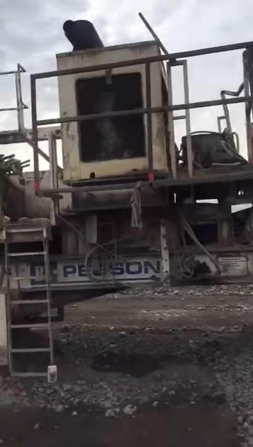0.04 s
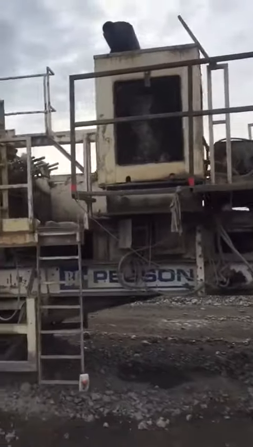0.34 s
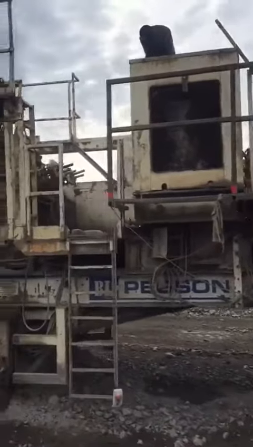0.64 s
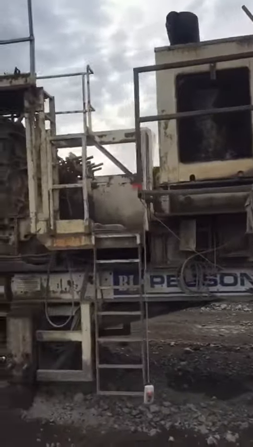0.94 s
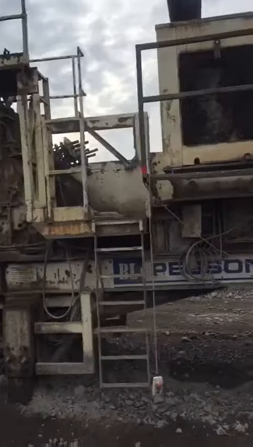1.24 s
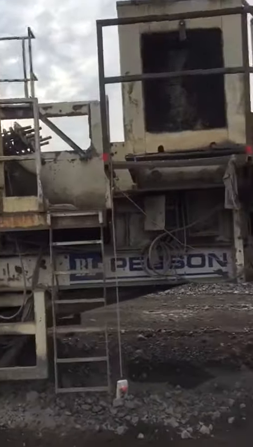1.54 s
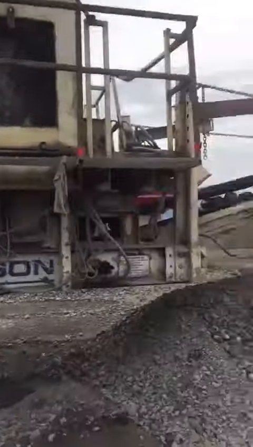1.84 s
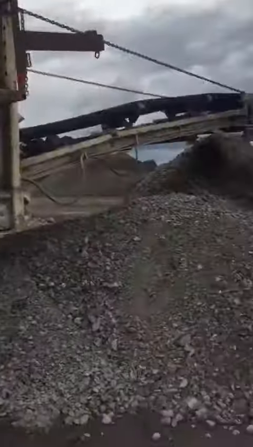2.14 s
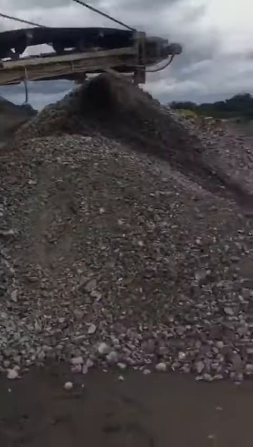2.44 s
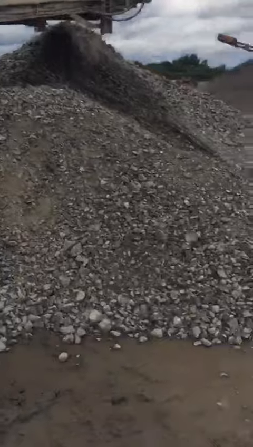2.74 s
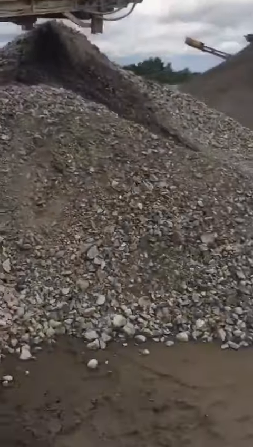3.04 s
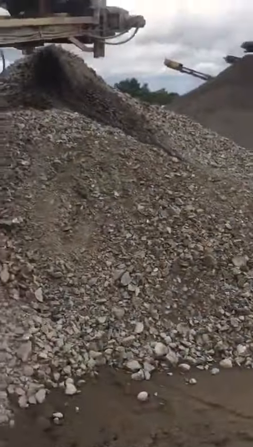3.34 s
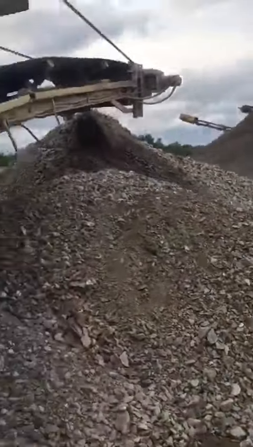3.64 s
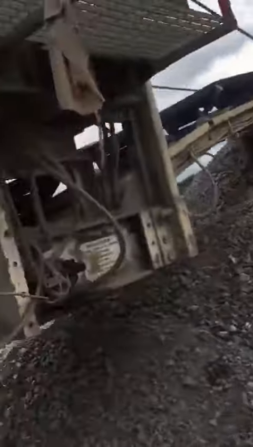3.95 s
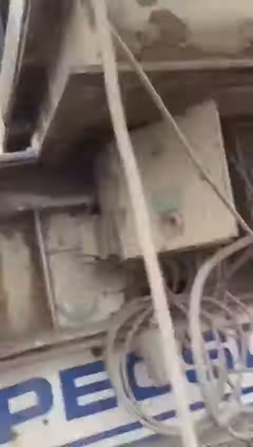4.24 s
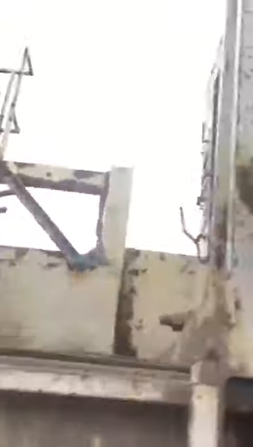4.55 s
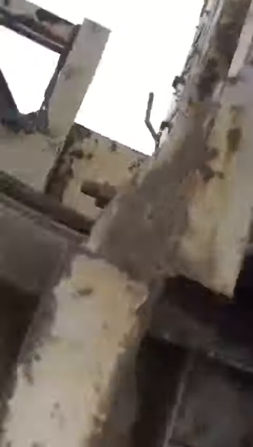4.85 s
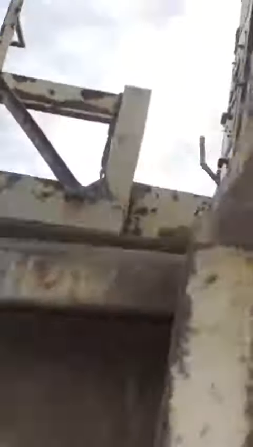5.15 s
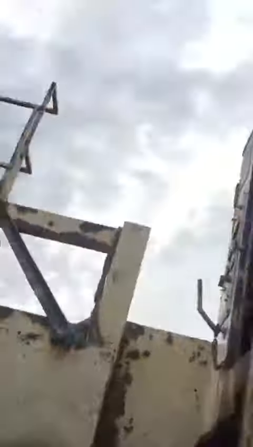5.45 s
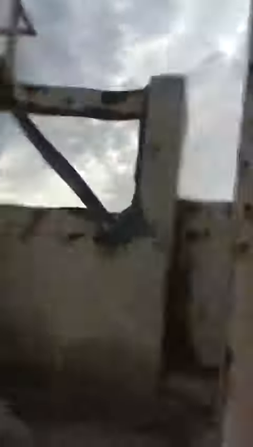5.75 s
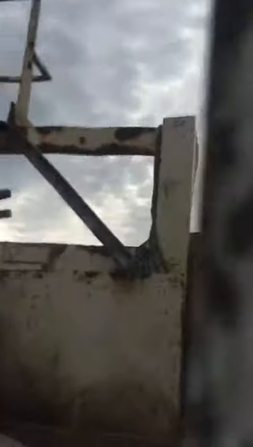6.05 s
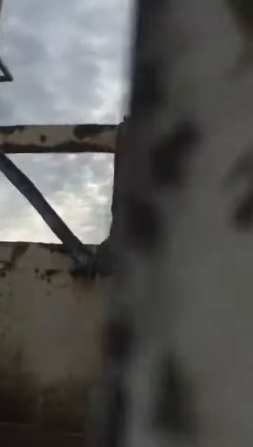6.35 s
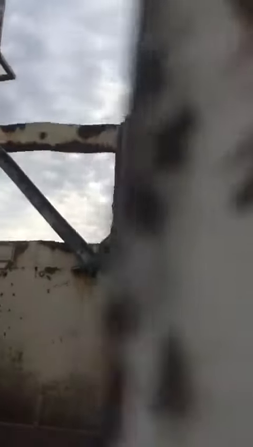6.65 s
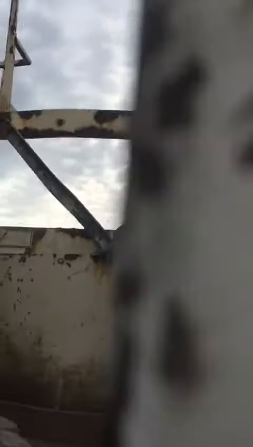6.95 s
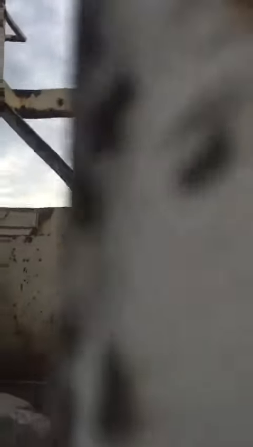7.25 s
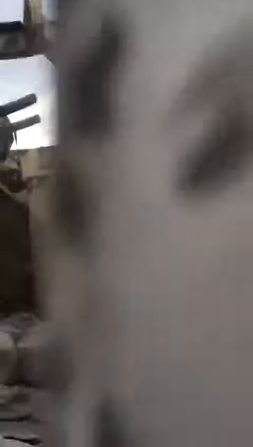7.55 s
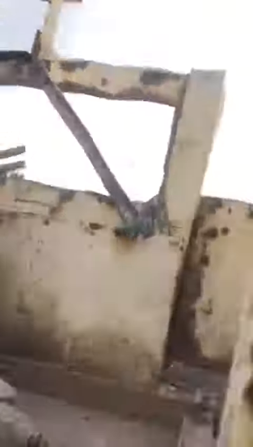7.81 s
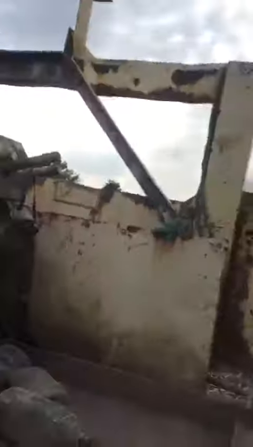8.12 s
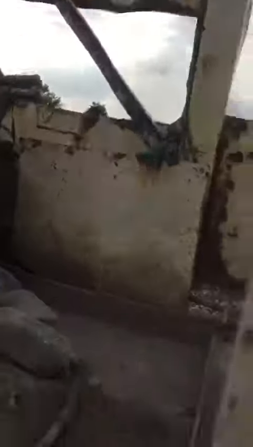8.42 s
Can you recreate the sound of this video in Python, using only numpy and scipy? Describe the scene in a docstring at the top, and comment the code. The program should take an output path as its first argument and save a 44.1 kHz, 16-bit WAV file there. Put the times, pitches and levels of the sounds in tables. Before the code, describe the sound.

A large rock crusher runs outdoors, its diesel engine droning and clattering at a constant speed over a low rumble. Steel panels ring and whine, crushed stone hisses off a conveyor belt, and single stones skitter down. Wind bumps the microphone in the first three seconds. As the microphone moves along the machine, the drone grows deeper and stronger, and a light, fast rattle joins briefly near the end.

```python
"""A mobile rock crusher's six-cylinder diesel drones and clatters outdoors at governed speed.
A second shaft beats against the exhaust, steel panels sing on the engine orders, the frame rumbles.
Crushed stone hisses off the belt, single stones skitter down, and early gusts bump the microphone.
The mix shifts as the listener walks past the stockpile and up behind a steel beam,
where something loose rattles once every engine cycle."""
import sys
import numpy as np
from scipy import signal
from scipy.fft import rfft, irfft, next_fast_len
from scipy.io import wavfile
from scipy.ndimage import uniform_filter1d, map_coordinates

SR = 44100
rng = np.random.default_rng(int(sys.argv[2]) if len(sys.argv) > 2 else 0)


def wav_out(sig):
    """Save sig, one row per channel (or a flat mono array), as 16-bit PCM at SR to the path in sys.argv[1]."""
    wavfile.write(sys.argv[1], SR, np.round(np.clip(np.atleast_2d(sig).T, -1, 1) * 32767).astype(np.int16))


N = 373968
CYCLE_HZ, SHAFT_HZ = 14.61, 40.53  # all six cylinders fire once in a cycle
TOP_HZ = 11900  # high cut of the mix

# the walk through six spots (front, turn, pile, chassis, beam, deck): arrival t/s, crossfade/s
WALK = [(-1, .2), (.85, .4), (2.72, .45), (3.85, .5), (5.62, .22), (7.87, .14)]
# a fader for each source, one value per spot: level/dB
EXHAUST_FADER = [-3, -4, -8, -1, 3, 1]
SHAFT_FADER = [-4, -8, -10, -1.5, 0.7, 2]
PANEL_FADER = [0.5, -2.5, 0.5, 2.5, 1, 1.5]
WHINE_FADER = [-34, -33.5, -33, -27.5, -36, -31.3]
HISS_FADER = [-29.5, -30, -29, -27.7, -30, -29.5]
RUMBLE_FADER = [-23.5, -22.8, -22, -23.7, -28, -27.5]

# the firing tone grows as the listener comes round towards the exhaust: t/s, level/dB
FIRING_LEVEL = [(0, -23.5), (0.55, -22), (2, -26), (2.7, -25.5), (3.45, -18.5), (4.1, -14.5), (4.7, -15),
                (6, -16.5), (8.48, -18.0)]
# low exhaust orders around the firing tone: multiple of the cycle, pre-fader level/dB
EXHAUST_ORDERS = [(4, -35.5), (7, -40), (8, -36), (10, -34), (11, -33.5), (12, -33), (14, -39.5), (15, -37)]
# hum of the second shaft: multiple of its speed, pre-fader level/dB
SHAFT_ORDERS = [(2, -27.5), (3, -23.5), (5, -49)]
# EQ of the engine clatter at each spot: f/Hz, gain/dB
FRONT_EQ = [(70, -27), (135, 0), (230, -11.5), (300, -3.5), (380, -11.5), (490, -16), (630, -7.5),
            (780, -12.5), (1300, -11), (1650, -14), (2400, -15), (3200, -21.5), (4500, -32), (7000, -60)]
TURN_EQ = [(70, -24), (140, -12.5), (230, -10), (300, -6.5), (420, -8), (630, -7), (800, -9.5),
           (1300, -9.5), (1650, -11.5), (2400, -13.5), (3200, -19.5), (4500, -32.5), (7000, -62)]
PILE_EQ = [(70, -30), (140, 4), (230, -6), (305, 0.5), (420, -8.5), (510, -16), (640, -8.5), (900, -10),
           (1070, -13), (1220, -7), (1450, -13.5), (2500, -13.5), (4500, -37), (7000, -62)]
CHASSIS_EQ = [(70, -30), (130, -9), (185, 2), (255, -9.5), (305, -3), (420, -12), (700, -10.5), (900, -8),
              (1250, -9.5), (1650, -12), (2200, -11.5), (3200, -22), (4500, -30), (7000, -62)]
BEAM_EQ = [(70, -25), (135, -3.5), (195, -4), (250, -11.5), (320, -6.5), (410, -16.5), (620, -11),
           (750, -14), (1230, -10), (1550, -14.5), (2050, -12), (2600, -15), (3100, -23.5), (7000, -47)]
DECK_EQ = [(70, -32), (135, -7), (185, -3), (235, -13.5), (305, -6), (380, -17), (550, -12.5), (850, -10),
           (1250, -10.5), (1600, -12.5), (2200, -11.5), (3100, -23.5), (4500, -32), (7000, -60)]
# how much of the clatter repeats from cycle to cycle: f/Hz, share of power
REPEAT_SHARE = [(130, 0.26), (300, 0.69), (600, 0.71), (1200, 0.53), (2200, 0.61), (3300, 0.42), (5000, 0)]
# the clatter at each spot: gain/dB, factor on the repeating share
CLATTER_MIX = [(1.6, 0.8), (-1.67, 0.76), (-0.7, 0.97), (1.33, 0.77), (3, 0.86), (3.5, 1)]
# brief dips and lifts in hiss and clatter: t/s, half length/s, hiss gain/dB, clatter gain/dB
DIPS_AND_LIFTS = [(.9, 0.2, 0.5, -2.3), (1.35, 0.3, -3, -1), (2.95, .12, 0, 1.5), (3.38, 0.19, 0.5, 2.5),
                  (4.474, 0.24, 0.5, 2), (5.083, 0.23, -3.5, -2), (5.63, .12, 1.8, -0.2)]

# panel tones, pre-fader: multiple of the cycle, front level/dB, side level/dB, behind-beam level/dB
PANEL_TONES = [(35, -48, -40, -38), (39, -39, -40, -44), (42, -32, -39, -38), (48, -36, -39, -44),
               (49, -45, -40, -39), (54, -44, -39, -43), (63, -42, -37.5, -46), (69, -39, -39, -34.5),
               (75, -44, -44, -35), (77, -46, -42, -39), (80, -39, -35, -27), (92, -40, -41, -38),
               (105, -37, -39, -50), (133, -50, -47, -37), (138, -45, -43, -37)]
# a panel sings out as the listener comes close: multiple of the cycle, t/s, half length/s, boost/dB
PANEL_CLOSE_UPS = [(80, 2.85, .2, 4), (80, 3.55, .22, 5), (63, 3.2, .35, 5), (63, 8.2, .35, 7)]
# the listener crosses a node of the whine's standing wave: t/s
WHINE_NODES = [3, 4.5, 5.77]
# EQ of the sliding chips: f/Hz, relative level/dB
HISS_EQ = [(1000, -40), (1800, -12), (3000, -2), (4300, -3), (4950, -5), (5500, -3), (5950, -6.5),
           (6600, -6.5), (7800, -11.5), (9000, -10.5), (10400, -16.5), (11200, -15), (11900, -25.5)]
# the belt tips a heavier load: t/s, half length/s, hiss boost/dB
HEAVY_LOADS = [(.62, .16, 2), (3.9, 0.45, 1.5)]
# EQ of the low bed from frame and air: f/Hz, relative level/dB
RUMBLE_EQ = [(20, -46), (32, -30), (45, -3.5), (60, -4), (76, 6), (100, -7), (140, -3), (220, -14.5),
             (500, -72)]
# single stones skitter down: centre t/s, level/dB, pitch f/Hz, half length/s
SKITTERS = [(.14, -35, 6500, .03), (.55, -38, 4500, .03), (.56, -33.5, 8000, 0.031),
            (.63, -37, 7700, 0.023), (.78, -36, 8000, .03), (1.86, -35, 6500, .02), (3.28, -32, 5500, .025),
            (3.413, -30, 2980, .02), (3.948, -35.5, 6450, 0.066), (4.14, -37, 7600, 0.065),
            (4.88, -31, 4700, .015), (5.351, -29, 3500, 0.016)]
# small eddies in the breeze: t/s, level/dB
BREEZE_LEVEL = [(.5, -50), (1, -29), (2.9, -29.5), (3.7, -45)]
# the strongest wind bumps: centre t/s, level at the crest/dB, half length/s, corner f/Hz
WIND_BUMPS = [(0.691, -16, 0.018, 200), (.8, -14, .021, 300), (0.894, -4.5, .016, 300),
              (1.085, -11.5, .014, 160), (1.154, -10, 0.019, 260), (1.231, -11, 0.033, 100),
              (1.296, -6.5, 0.018, 270), (1.46, -15.5, 0.034, 130), (1.58, -13.5, .03, 230),
              (1.84, -5.5, 0.015, 300), (1.889, -8, 0.02, 400), (2.001, -7.5, 0.0054, 160),
              (2.239, -13.5, 0.03, 260), (2.363, -17, 0.029, 600), (2.53, -15, 0.036, 200),
              (2.981, -16.5, 0.043, 280)]


def amp(db):
    """Decibels to gain."""
    return 10 ** (np.asarray(db) / 20)


def unit(x):
    """x scaled to rms 1."""
    return x / np.sqrt(np.mean(x ** 2) + 1e-20)


def clock():
    """The time of every sample."""
    return np.arange(N) / SR


def along(points, hz):
    """(f/Hz, value) points read on a log frequency axis."""
    f, values = np.transpose(points)
    return np.interp(np.log(hz + 1), np.log(f + 1), values)


def envelope(points):
    """Straight ramps through (t/s, value) points."""
    return np.interp(clock(), *np.transpose(points))


def wobble(rate):
    """A smooth random curve, rate knots a second."""
    return map_coordinates(rng.standard_normal(int(N * rate / SR) + 4), [clock() * rate])


def swell(s, half):
    """A smooth rise to 1 and fall around the moment s."""
    return np.exp(-((clock() - s) / half) ** 2)


def filtered(x, response):
    """x through a gain that depends on frequency."""
    size = next_fast_len(N + 8192)
    return irfft(rfft(x, size) * response(np.fft.rfftfreq(size, 1 / SR)), size)[:N]


def coloured(x, eq):
    """x through an EQ curve, at rms 1."""
    return unit(filtered(x, lambda hz: amp(along(eq, hz))))


def tone(turns, db):
    """A sine of the given rms level."""
    return np.sqrt(2) * amp(db) * np.cos(2 * np.pi * turns)


def walk():
    """Crossfades from spot to spot: six shares that add up to 1."""
    arrived = [np.clip((clock() - s) / fade + .5, 0, 1) for s, fade in WALK] + [np.zeros(N)]
    return np.abs(np.diff(arrived, axis=0))


def fader(levels_db, shares):
    """A source's fader ride in dB along the walk."""
    return np.asarray(levels_db) @ shares


def dips_and_lifts():
    """dB curves for hiss and clatter: they dip after the loudest wind bump, then shift along the walk."""
    return sum(np.outer(gains_db, swell(s, half)) for s, half, *gains_db in DIPS_AND_LIFTS)


def drone(cycles, shares):
    """The exhaust booms six times a cycle; the second shaft, a little lower, beats against it."""
    exhaust_db, shaft_db = fader(EXHAUST_FADER, shares), fader(SHAFT_FADER, shares)
    firing = tone(6 * cycles, envelope(FIRING_LEVEL))
    exhaust = sum(tone(order * cycles + rng.random(), db + exhaust_db + 0.46 * wobble(1.79))
                  for order, db in EXHAUST_ORDERS)
    shaft = sum(tone(order * SHAFT_HZ * clock(), db + shaft_db) for order, db in SHAFT_ORDERS)
    return firing + exhaust + shaft


def knocks(cycles, decay_s=.02, uneven_db=1, ripple_db=5.5, cylinders=6, size=8192):
    """Each cylinder fires with its own knock, and the round loops every engine cycle; rms 1."""
    age = (np.arange(size) / size - np.arange(cylinders)[:, None] / cylinders) % 1 / CYCLE_HZ
    bursts = rng.standard_normal(age.shape) * np.exp(-age / decay_s)
    bursts *= amp(uneven_db * rng.standard_normal((cylinders, 1)))
    orders = rfft(bursts.sum(axis=0))
    # whitened, then reflections among the steelwork favour some orders and weaken others
    orders = orders / np.abs(orders) * amp(ripple_db * rng.uniform(-1, 1, len(orders)))
    loop = irfft(orders * (np.arange(len(orders)) * CYCLE_HZ < TOP_HZ))
    return unit(np.interp(cycles % 1, np.arange(size) / size, loop, period=1))


def clatter(cycles, shares):
    """Looping knocks over fan and combustion noise; each spot has its own mix of reflections."""
    out = np.zeros(N)
    pulse_db = .5 * tone(6 * cycles, 0)
    rush = unit(rng.standard_normal(N) * amp(pulse_db + 0.98 * wobble(20)))
    bandwidth = TOP_HZ / (SR / 2)  # brings the band-limited knocks to the density of the rush
    eqs = [FRONT_EQ, TURN_EQ, PILE_EQ, CHASSIS_EQ, BEAM_EQ, DECK_EQ]
    for share, eq, (db, steadiness) in zip(shares, eqs, CLATTER_MIX):
        repeats = lambda hz: np.clip(steadiness * along(REPEAT_SHARE, hz), 0, .97)
        colour = lambda hz: amp(along(eq, hz))
        knocking = filtered(knocks(cycles), lambda hz: colour(hz) * np.sqrt(repeats(hz) * bandwidth))
        rushing = filtered(rush, lambda hz: colour(hz) * np.sqrt(1 - repeats(hz)))
        out += np.sqrt(share) * amp(db) * (knocking + rushing)
    _, ride_db = dips_and_lifts()
    return out * amp(ride_db)


def panels(cycles, at_front, behind_beam):
    """Steel panels sing on single engine orders; front, side and beam each favour their own."""
    ring = np.zeros(N)
    walking = 1 - .75 * np.maximum(at_front, behind_beam)
    for order, front_db, side_db, beam_db in PANEL_TONES:
        db = side_db + (front_db - side_db) * at_front + (beam_db - side_db) * behind_beam
        db += sum(boost * swell(s, half) for k, s, half, boost in PANEL_CLOSE_UPS if k == order)
        # walking through standing waves makes each tone swell, fade and drift
        fading_db = 3 * walking * wobble(4)
        drift = .2 * walking * wobble(3)
        ring += tone(order * cycles + rng.random() + drift, db + fading_db - walking)
    return ring


def whine(cycles, shares, order=57, dip_db=9, dip_half_s=0.19):
    """One panel sings above the rest and drops away at each node the listener crosses."""
    nodes_db = dip_db * sum(swell(s, dip_half_s) for s in WHINE_NODES)
    return tone(order * cycles, fader(WHINE_FADER, shares) - nodes_db + 1.2 * wobble(8))


def sparkle(x, depth_db):
    """x with brief random highlights scattered over time and frequency."""
    spectrogram = signal.stft(x, nperseg=256)[2]
    patches = rng.standard_normal(spectrogram.shape)
    for _ in range(2):
        patches = uniform_filter1d(uniform_filter1d(patches, size=4, axis=0), size=12, axis=1)
    return signal.istft(spectrogram * amp(depth_db * unit(patches)), nperseg=256)[1][:N]


def stone_hiss(shares, clicks_per_s=1500):
    """Countless chips slide and click on the belt and the pile, louder with each heavy load."""
    clicks = unit(rng.standard_normal(N) * (rng.random(N) < clicks_per_s / SR))
    stream = sparkle(rng.standard_normal(N) + 0.27 * clicks, depth_db=0.96) * amp(0.23 * wobble(16))
    load_db = sum(db * swell(s, half) for s, half, db in HEAVY_LOADS)
    ride_db, _ = dips_and_lifts()
    return coloured(stream, HISS_EQ) * amp(fader(HISS_FADER, shares) + load_db + ride_db)


def rumble(shares):
    """The heavy frame and the moving air lay a low bed under everything."""
    bed = coloured(rng.standard_normal(N), RUMBLE_EQ)
    return bed * amp(fader(RUMBLE_FADER, shares) + 0.5 * wobble(7.9))


def skitters(contacts_per_s=3000, relative_width=0.13):
    """Each larger stone makes a quick run of tiny contacts, all near its own pitch."""
    out, size = np.zeros(N + SR), SR // 2
    t, hz = (np.arange(size) - size // 2) / SR, np.fft.rfftfreq(size, 1 / SR)
    for s, db, pitch_hz, half in SKITTERS:
        contacts = rng.standard_normal(size) * (rng.random(size) < contacts_per_s / SR)
        resonance = 1 / (1 + ((hz / pitch_hz - 1) / relative_width) ** 2)
        ring = unit(irfft(rfft(contacts) * resonance, size))
        out[round(s * SR):][:size] += amp(db) * ring * np.exp(-(t / half) ** 2)
    return out[size // 2:][:N]


def turbulence(hz, corner_hz, low_cut_hz=38.6):
    """EQ of eddies at the microphone port: little sub-bass, and an ever steeper fall past the corner."""
    port = (hz / low_cut_hz) ** 3 / (1 + (hz / low_cut_hz) ** 3.4)
    return port / np.sqrt((1 + (hz / corner_hz) ** 3) * (1 + (hz / corner_hz / 4.2) ** 6))


def breeze(eddies_per_s=30, swing_db=8):
    """Small eddies flick the microphone port at random while the breeze blows."""
    air = filtered(rng.standard_normal(N), lambda hz: turbulence(hz, corner_hz=420))
    flutter = amp(swing_db * np.tanh(wobble(eddies_per_s)))
    return unit(air * flutter) * amp(envelope(BREEZE_LEVEL))


def gusts(ragged_db=2.5, ragged_per_s=160, size=16384):
    """Gusts hit the microphone port: ragged thumps with a quick attack and a slower release."""
    out = np.zeros(N + size)
    t, hz = (np.arange(size) - size // 2) / SR, np.fft.rfftfreq(size, 1 / SR)
    ragged = amp(ragged_db * wobble(ragged_per_s))  # each bump breaks into quick sub-eddies
    for s, db, half, corner_hz in WIND_BUMPS:
        start = round(s * SR) - size // 2
        shape = np.exp(-np.abs(t / half) ** np.where(t < 0, 4, 2) / 2)
        air = irfft(turbulence(hz, corner_hz) * np.exp(2j * np.pi * rng.random(len(hz))))
        thump = unit(air * shape * ragged[start:][:size])
        out[start:][:size] += amp(db) * thump * np.sqrt(np.mean(shape ** 2))
    return out[:N]


def rattle(cycles, behind_beam, pitch_hz=1055, half_s=.0055):
    """Something loose chatters once every engine cycle, heard only from behind the beam."""
    t = (cycles % 1 - .5) / CYCLE_HZ
    jitter = .05 * wobble(200)
    burst = amp(-18 + 1.5 * wobble(14)) * np.exp(-(t / half_s) ** 2)
    return tone(pitch_hz * t + jitter, 0) * burst * behind_beam


def scene():
    """The engine wavers only slightly around its governed speed; the walk sets the mix."""
    speed_hz = CYCLE_HZ * (1 + 0.0005 * wobble(2) + 0.00081 * wobble(15))
    cycles = np.cumsum(speed_hz) / SR
    shares = walk()
    at_front, *_, behind_beam, _ = shares
    engine = drone(cycles, shares) + clatter(cycles, shares)
    ringing = panels(cycles, at_front, behind_beam) * amp(fader(PANEL_FADER, shares))
    steelwork = ringing + whine(cycles, shares) + rattle(cycles, behind_beam)
    stone = stone_hiss(shares) + skitters()
    return (engine + steelwork + stone + rumble(shares) + gusts() + breeze())[None]


def record(dry):
    """A soft clip rounds the tallest peaks, then a low cut and a brick-wall high cut trim the mix."""
    ceiling, low_cut_hz = .94, 31
    rounded = dry[0] / (1 + np.abs(dry[0] / ceiling) ** 8) ** (1 / 8)
    return filtered(rounded, lambda hz: hz ** 6 / (hz ** 6 + low_cut_hz ** 6) * (hz < TOP_HZ))[None]


dry = scene()
out = record(dry)
wav_out(out)
```